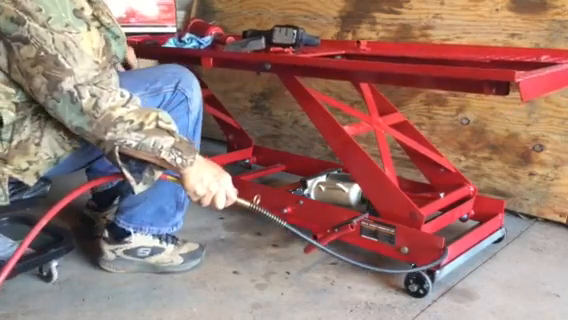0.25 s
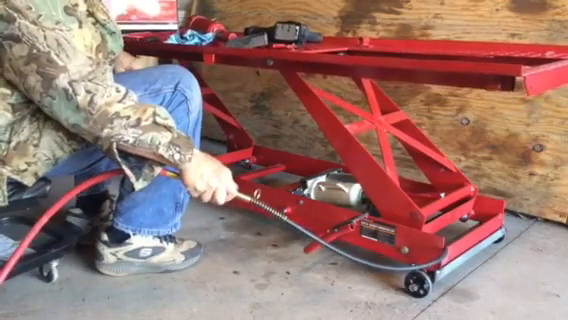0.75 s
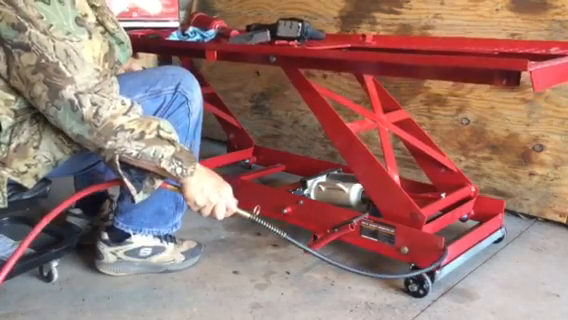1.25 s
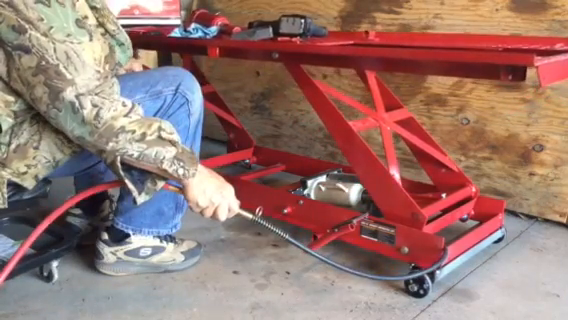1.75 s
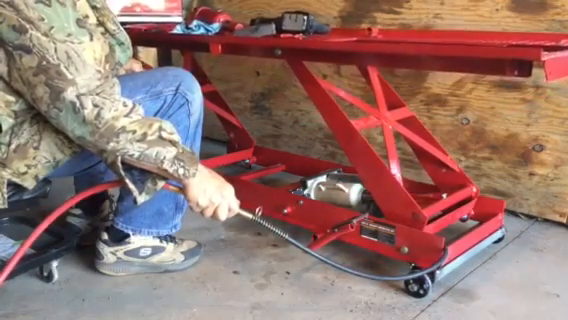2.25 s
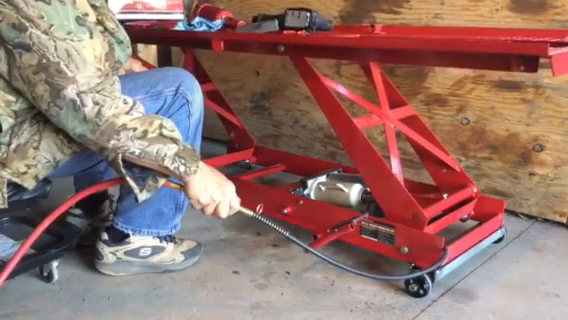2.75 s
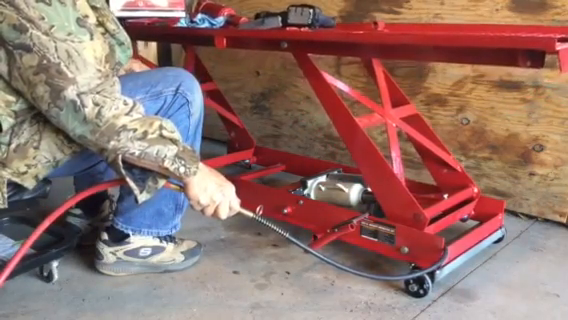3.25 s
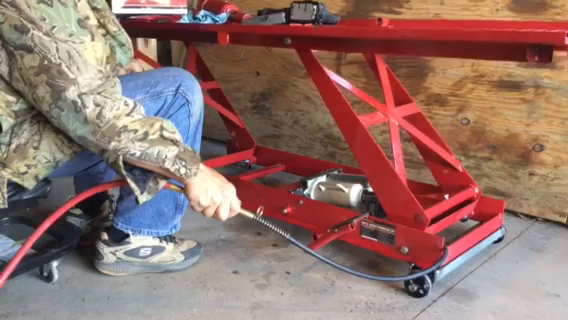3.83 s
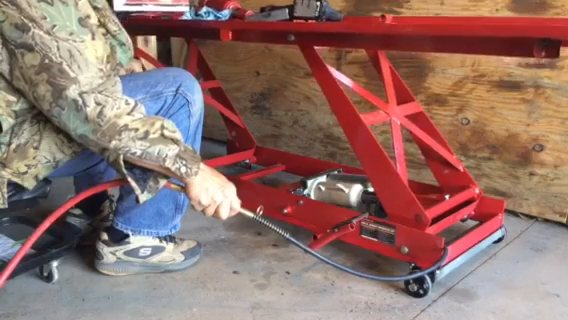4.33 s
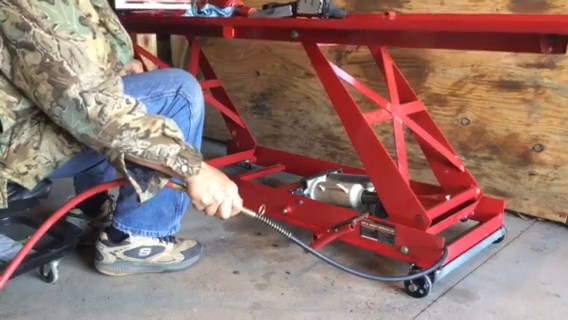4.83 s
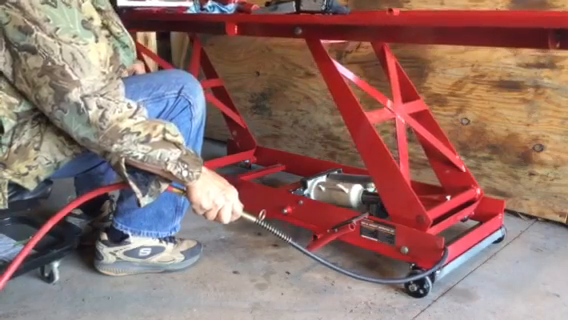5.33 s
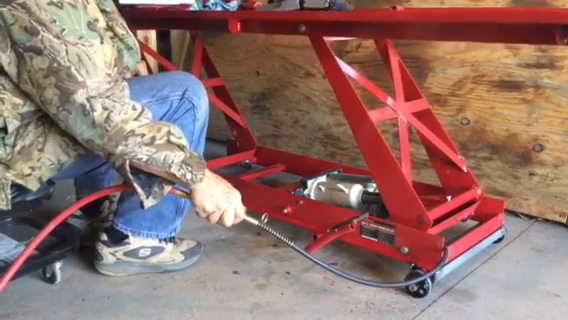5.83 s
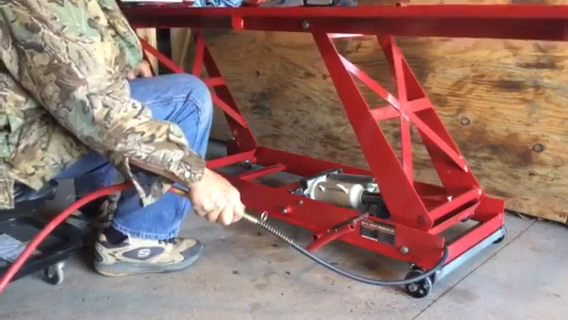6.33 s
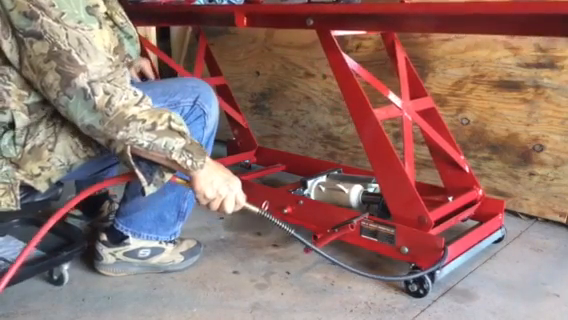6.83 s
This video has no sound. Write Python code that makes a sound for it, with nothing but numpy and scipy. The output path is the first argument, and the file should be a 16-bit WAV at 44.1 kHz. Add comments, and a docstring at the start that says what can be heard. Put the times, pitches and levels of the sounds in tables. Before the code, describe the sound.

An air-powered hydraulic pump runs throughout, raising a steel scissor lift at about eleven strokes a second. Each stroke gives a bright puff of hiss, a sharp metal knock and a valve clack, and the frame rings along. A dull bump comes right at the start, and soft air thuds recur irregularly. The knocking eases slightly, then hardens. It is heard from nearby in a garage, over a low room tone.

```python
"""Air pump raising a scissor lift

An air-over-hydraulic pump drives a steel scissor lift up in a garage, eleven strokes a second.
In each stroke the exhaust opens with a puff and a hiss, then the piston slams home: the pump
knocks, the valve clacks, loose parts tick and the frame rings. As the lift climbs, the knock
eases, then hardens, and the ring slowly changes colour over a low room tone."""
import sys
import numpy as np
from scipy import signal
from scipy.fft import irfft
from scipy.io import wavfile
from scipy.ndimage import uniform_filter1d

SR = 44100
rng = np.random.default_rng(int(sys.argv[2]) if len(sys.argv) > 2 else 0)


def transcribe(u):
    """Save the signal u as a 16-bit wav file named by the first command-line argument.

    u: samples, shape (n,) or (channels, n), limited to [-1, 1]; the rate is SR.
    q: integer samples, one column per channel.
    """
    v = np.clip(np.atleast_2d(u).T, -1, 1)
    q = np.round(v * 32767).astype(np.int16)
    wavfile.write(sys.argv[1], SR, q)


N = 313110
TIME = np.arange(N) / SR

# The pump's pace: time_s, strokes_done
STROKE_COUNT = [(-0.5237, 0), (1.6448, 24), (2.9148, 38), (4.0011, 50), (5.6308, 68), (7.1732, 85)]
# Piston hits and rebounds in one stroke; one rebound drags noticeably as the lift rises:
# delay_s, drift_s_per_s, pitch_hz, width_hz, relative_db
PISTON_HITS = [(0.0028, 0, 2150, 377, 7.5), (0, 0, 1430, 690, -8), (0.012, 0.0018, 2165, 280, -2),
               (0.016, 0.000073, 1384, 600, -8), (0.013, 0.00026, 1297, 500, -18)]
# The valve's double clack: delay_s, drift_s_per_s, pitch_hz, width_hz, relative_db
VALVE_HITS = [(.0002, 0, 3283, 480, -3), (.0052, 0, 3270, 483, -7.5)]
# The knock eases early in the climb, then hardens: time_s, level_db
KNOCK_FADER = [(0.0, -40.5), (1.7, -42), (2.6, -45.5), (4.4, -41), (5.7, -38.5), (7.1, -37)]
# The clack starts soft and comes up to a steady level: time_s, level_db
CLACK_FADER = [(0.4, -52), (1.1, -44.5)]
# Bright top of the exhaust hiss: frequency_hz, relative_db
BRIGHT_HISS_EQ = [(2800, -13), (3300, -21), (3950, -10), (4800, -12), (5700, -7), (6500, -8.5),
                  (7500, -8.5), (9200, -3), (10700, -5), (12500, 0), (14300, -2.5), (15600, -8.5)]
# Lower band of the exhaust hiss: frequency_hz, relative_db
LOW_HISS_EQ = [(1000, -13), (1300, 2), (1800, -2.5), (2150, 0.5), (2450, 2), (2700, -1), (3000, -5),
               (3450, 1.5), (3800, 0), (4400, -36)]
# Whistles of the exhaust port, set against the hiss:
# pitch_hz, width_hz, relative_db, strongest_at_s, half_width_s
PORT_WHISTLES = [(5895, 160, -13, 2.5, 2.45), (8080, 160, -18.5, 7.5, 2.8), (8970, 450, -10, 15, 2.3),
                 (9530, 210, -14.5, -3, 3.5), (12100, 170, -20, -6, 5.5), (12700, 220, -14, 4.7, 2.6)]
# Clear tones of garage, deck and frame, each strongest at one height of the lift:
# pitch_hz, level_db, t60_s, strongest_at_s, half_width_s
FRAME_TONES = [(53.3, -52.5, 1, 0, 3.6), (90, -46, 1, -3.5, 5.5), (131.5, -46, 0.86, 2.5, 3.8),
               (288.5, -55.5, 0.63, 4.5, 1.5), (294.1, -55, 1, 2.5, 0.85), (321.4, -55.5, 0.69, 2.4, 1.15),
               (389.8, -56.5, 0.32, 3, 1.5), (476.4, -59.5, 0.3, 1.2, 2.4), (556, -75, 0.57, 2, 2.6),
               (827, -60, 0.22, 6, 2.5), (1276, -55.5, 0.56, 2.5, 2.4), (1350, -47, 0.46, 5.0, 1.64),
               (1403, -53.5, 0.44, 5.5, 2.8), (1563, -53, 0.46, 0.7, 1.3), (1676, -52.5, 0.38, 2.5, 2.2),
               (1942, -47, 0.34, 7.5, 2.7), (2112, -46.5, 0.51, 6, 1.1), (2156, -42.5, 0.59, 4.5, 1.5),
               (2410, -47, 0.21, -2, 14), (3220, -49, 0.23, 8, 5.4), (3560, -53.5, 0.23, 1.2, 2.2)]
# Dense metallic wash of frame and garage: frequency_hz, relative_db
RING_EQ = [(950, -28), (1130, -5), (1350, -6), (1550, -8.5), (1840, -14.5), (1980, -0.5), (2150, -0.5),
           (2450, 0), (2600, -15), (2950, -48), (3230, -3), (3560, -2), (3800, -20.5), (4500, -18.5)]
# Low body rumble: frequency_hz, relative_db
RUMBLE_EQ = [(125, -38), (160, 5.5), (220, 1), (245, -3.5), (295, 0.5), (350, -6.5), (480, -6), (600, -7.5),
             (820, -9.5), (950, -15.5), (1100, -32)]
# Air surges, each a heavy thud at a slam, answered as the port opens a little later:
# time_s, level_db, strokes_until_answer
AIR_SURGES = [(0.2, -33.5, 3), (0.29, -34, 3), (1.02, -31.5, 2), (1.56, -32, 1), (2.01, -34.5, 1),
              (2.37, -31.5, 1), (2.65, -33.5, 2), (3.1, -36, 1), (3.46, -37, 2), (4.0, -41, 1),
              (4.46, -33, 1), (4.91, -31.5, 1), (5.36, -31.5, 1), (5.81, -32, 1), (6.18, -33.5, 1),
              (6.81, -33, 1)]
# Garage room tone: frequency_hz, relative_db
ROOM_EQ = [(20, -20), (38, -19), (60, 1), (130, 3.5), (180, -1.5), (300, -5.5), (420, -8), (900, -14),
           (2000, -13.5), (5000, -20.5)]


def metal_hits(slams, hits, spread_db, jitter_s):
    """Piston or valve strikes and rebounds: a tight cluster of short knocks on every stroke."""
    out = 0
    for delay_s, drift, hz, width_hz, db in hits:
        lag_s = delay_s + drift * slams + jitter_s * rng.standard_normal(len(slams))
        times = slams + np.clip(lag_s, -.02, .04)
        out = out + play(times, from_db(db) * uneven(slams, spread_db), knock(hz, width_hz))
    return rms_one(out)


def air_flow(since_slam, lead_s=.026, attack_s=.0054, hold_s=.0096, leak_db=-10.5):
    """The port opens ahead of the slam; the flow builds, holds briefly, then falls to a leak."""
    rise_db_per_s, fall_db_per_s = 60, 270
    opened = np.clip((since_slam + lead_s) / attack_s, 0, 1)
    rise_db = rise_db_per_s * np.minimum(since_slam, 0)
    fall_db = fall_db_per_s * np.maximum(since_slam - hold_s, 0)
    return from_db(leak_db + opened * np.maximum(rise_db - fall_db - leak_db, 0))


def exhaust(slams, stroke):
    """Air jets through the whistling port, with a sharp crack of hiss at the slam."""
    since_slam = TIME - slams[stroke]
    flow = air_flow(since_slam) * uneven(slams, spread_db=0.41)[stroke]
    crack = from_db(-0.5) * np.exp(-np.abs(since_slam) / 0.0037) * (since_slam > 0)
    hiss = noise(BRIGHT_HISS_EQ)
    for hz, width_hz, db, centre_s, width_s in PORT_WHISTLES:
        whistle = rms_one(band(rng.standard_normal(N), hz, width_hz, order=2))
        hiss = hiss + whistle * from_db(db) * swell(centre_s, width_s)
    jet = (flow + crack) * hiss
    echoes_s = rng.uniform(.0005, .005, 4)   # nearby steel and floor comb the hiss
    jet = jet + from_db(-13.5) * sum(np.roll(jet, int(lag * SR)) for lag in echoes_s)
    low_hiss = flow * noise(LOW_HISS_EQ)
    return from_db(-34.5) * rms_one(jet) + from_db(-47) * rms_one(low_hiss)


def frame_ring(slams):
    """Each slam strikes the frame's clear modes, which ring on into the next stroke."""
    age, out = np.arange(SR // 2) / SR, 0
    for hz, db, t60, centre_s, width_s in FRAME_TONES:
        mode = np.sin(2 * np.pi * hz * age) * from_db(-60 * age / t60)
        times = slams + .00006 * rng.standard_normal(len(slams))
        ringing = play(times, uneven(slams, spread_db=0.9), mode)
        ringing /= np.sqrt(uniform_filter1d(ringing ** 2, size=SR // 2) + 1e-12)   # ride the level flat
        out = out + ringing * from_db(db) * swell(centre_s, width_s)
    return out


def dense_ring(slams, eq, t60, tail_t60, tail_db, rise_s, colours=6, size=16384):
    """Crowded modes answer each slam as a wash whose colour shifts as the scissor arms open."""
    age, out = np.arange(size) / SR, 0
    attack = 1 - np.exp(-age / rise_s)
    decay = from_db(-60 * age / t60) + from_db(tail_db - 60 * age / tail_t60)
    height = np.clip(slams / TIME[-1], 0, 1) * (colours - 1)
    for colour in range(colours):
        crossfade = np.sqrt(np.maximum(1 - np.abs(height - colour), 0))
        response = rms_one(noise(eq, size) * attack * decay)
        out = out + play(slams, crossfade * uneven(slams, spread_db=0.83), response)
    return rms_one(out)


def puffs(slams, lead_s=.0184, lag_s=.0027, answer_db=-6):
    """Air thuds as the port opens and again at the slam; surges lay heavier thuds on top."""
    thud = -knock(hz=85.6, width_hz=50.6, order=2)
    openings, closings = slams - lead_s, slams + lag_s
    steady = play(openings, from_db(-38), thud) + play(closings, from_db(-40), thud)
    surge_s, db, wait = np.transpose(AIR_SURGES)
    surging = np.abs(slams - surge_s[:, None]).argmin(axis=1)   # nearest stroke
    answering = surging + np.round(wait).astype(int)
    surges = play(closings[surging], from_db(db), thud)
    answers = play(openings[answering], from_db(db + answer_db), thud)
    return steady + surges + answers


def starting_bump(start_s=.1125):
    """One dull bump as the lift gets going."""
    return play([start_s], from_db(-23.5), -knock(hz=160, width_hz=110, order=2))


def rattle(slams, parts=6):
    """Loose parts tick at random just after each slam."""
    out = 0
    for hz in np.linspace(1250, 3550, parts):
        times = slams + .002 + rng.rayleigh(.011, len(slams))
        out = out + play(times, uneven(slams, spread_db=1.5), knock(hz, width_hz=590))
    return rms_one(out)


def room_tone():
    """The garage lays a steady, dark bed of noise under the pump."""
    return from_db(-47) * noise(ROOM_EQ)


def from_db(db):
    """Decibels as a gain."""
    return 10 ** (np.asarray(db) / 20)


def rms_one(x):
    """The same sound at rms 1."""
    return x / np.sqrt(np.mean(x ** 2) + 1e-20)


def fader(points):
    """A gain that glides between level marks."""
    return from_db(np.interp(TIME, *np.transpose(points)))


def swell(centre_s, width_s):
    """A resonance blooms and fades as the lift passes through one height."""
    return 1 / np.sqrt(1 + ((TIME - centre_s) / width_s) ** 2)


def uneven(times, spread_db):
    """Random gains: no two strokes land equally hard."""
    return from_db(spread_db * rng.standard_normal(len(times)))


def noise(eq, size=N):
    """Noise coloured by an EQ curve; rms 1."""
    hz, db = np.transpose(eq)
    bins = np.maximum(np.fft.rfftfreq(size, 1 / SR), 1)
    gain = from_db(np.interp(np.log(bins), np.log(hz), db, left=-np.inf, right=-np.inf))
    return rms_one(irfft(gain * np.exp(2j * np.pi * rng.random(len(bins))), size))


def band(x, hz, width_hz, order):
    """Coupled resonances that pass one band."""
    edges = np.clip([hz - width_hz / 2, hz + width_hz / 2], 15, .45 * SR)
    return signal.sosfilt(signal.butter(order, edges, "band", fs=SR, output="sos"), x)


def knock(hz, width_hz, order=3, size=4096):
    """A heavily damped resonance that swells and dies quickly; peak 1."""
    wave = band(signal.unit_impulse(size), hz, width_hz, order)
    return wave / np.abs(wave).max()


def play(times, gains, response):
    """Triggers one sound at each time; a second of pre-roll lets the pump be running already."""
    triggers = np.zeros(N + 2 * SR)
    triggers[np.round(np.asarray(times) * SR).astype(int) + SR] = gains
    return signal.oaconvolve(triggers, response)[SR:SR + N]


def scene():
    """One stroke clock drives knocks, air and ringing over the room tone."""
    time_s, done = np.transpose(STROKE_COUNT)
    slams = np.interp(np.arange(round(done[-1]) + 1), done, time_s)
    stroke = np.floor(np.interp(TIME, time_s, done) + 3 / 8).astype(int)   # starts 3/8 cycle pre-slam
    knocks = fader(KNOCK_FADER) * metal_hits(slams, PISTON_HITS, spread_db=0.3, jitter_s=.00003)
    clacks = fader(CLACK_FADER) * metal_hits(slams, VALVE_HITS, spread_db=1.4, jitter_s=.00005)
    ticks = from_db(-46.5 - 2.7 * TIME) * rattle(slams)   # the slack is taken up as the lift rises
    wash = from_db(-39.5) * dense_ring(slams, RING_EQ, t60=.18, tail_t60=.6, tail_db=-8, rise_s=.0021)
    rumble = from_db(-48) * dense_ring(slams, RUMBLE_EQ, t60=.55, tail_t60=.64, tail_db=-4, rise_s=.017)
    room = room_tone()
    steel = knocks + clacks + ticks + wash + frame_ring(slams)
    air = exhaust(slams, stroke) + puffs(slams)
    return (steel + air + rumble + starting_bump() + room)[None]


def record(dry):
    """The microphone drops the deep bass; the top is cut steeply."""
    low_cut_hz, high_cut_hz = 34, 15330
    thinned = signal.sosfilt(signal.butter(3, low_cut_hz, "high", fs=SR, output="sos"), dry)
    return signal.sosfilt(signal.ellip(12, .2, 85, high_cut_hz, fs=SR, output="sos"), thinned)


dry = scene()
out = record(dry)
transcribe(out)
```